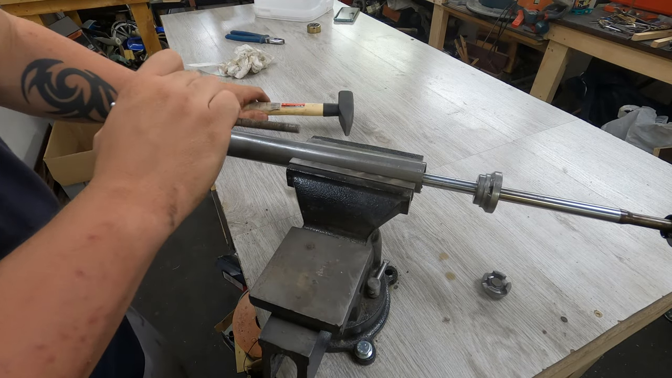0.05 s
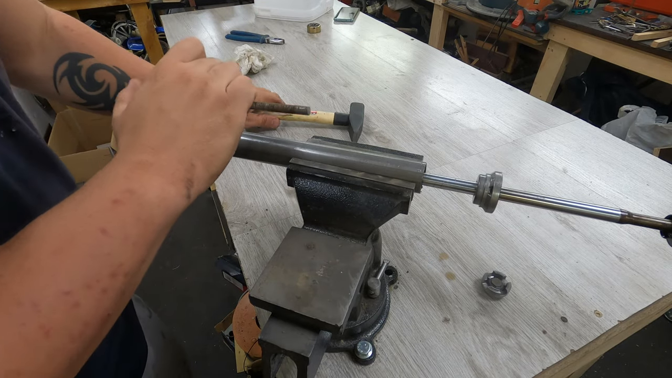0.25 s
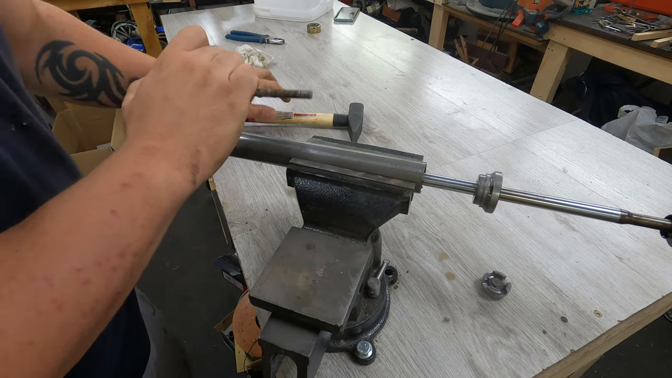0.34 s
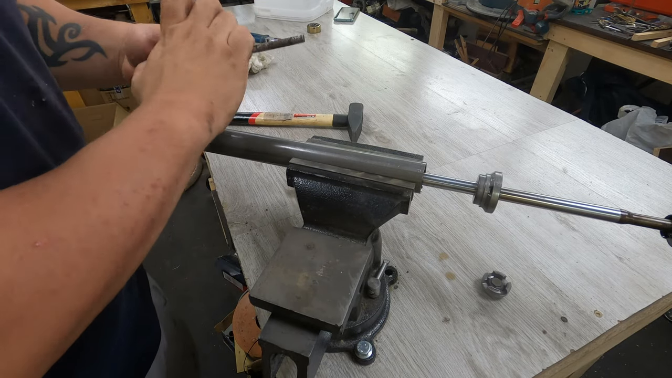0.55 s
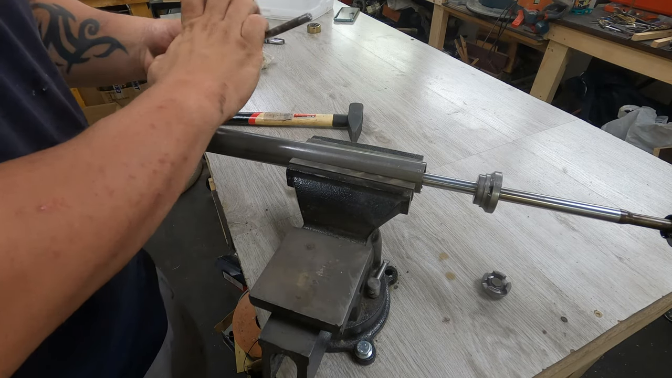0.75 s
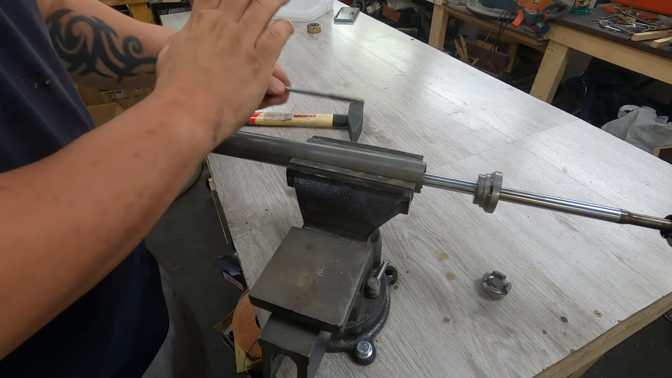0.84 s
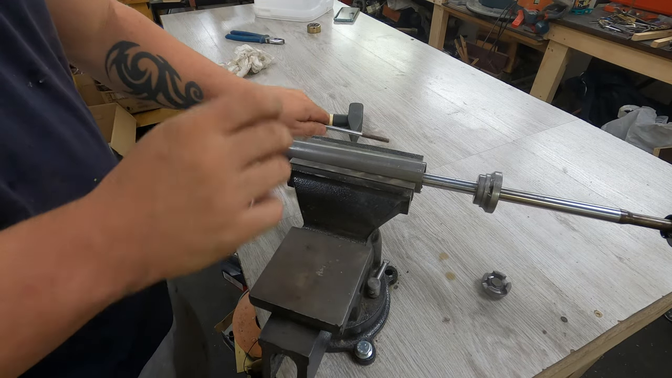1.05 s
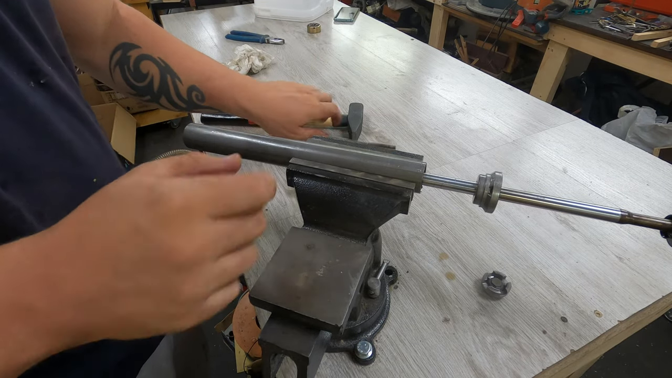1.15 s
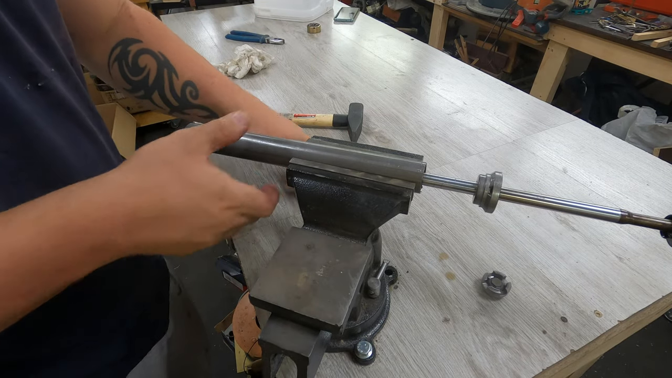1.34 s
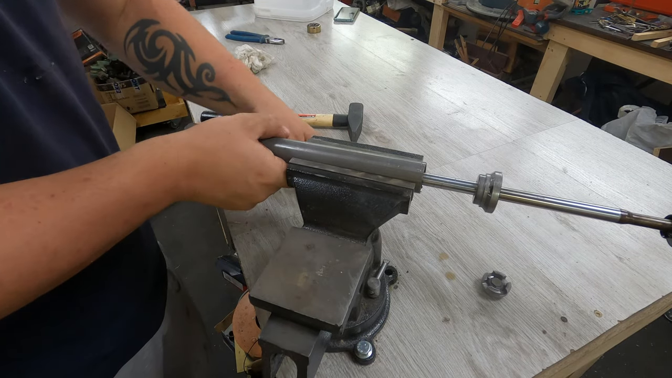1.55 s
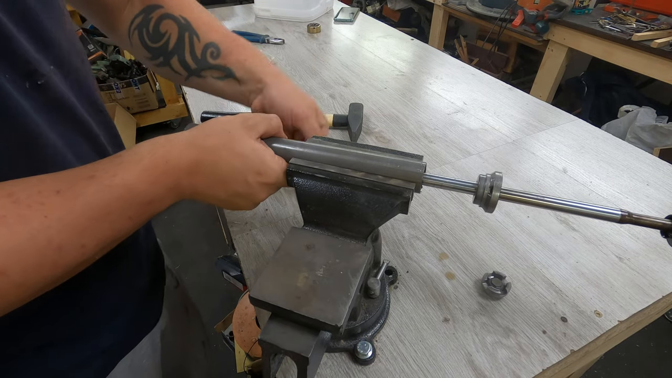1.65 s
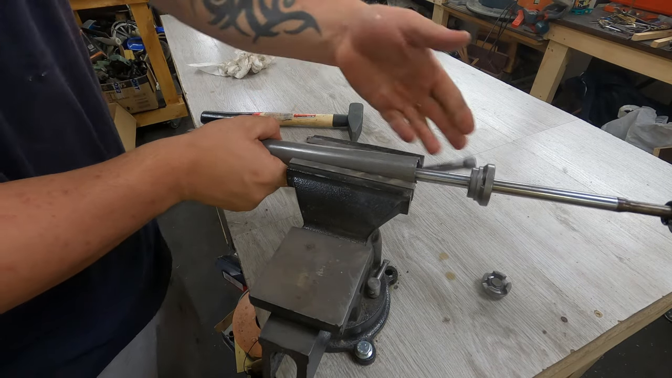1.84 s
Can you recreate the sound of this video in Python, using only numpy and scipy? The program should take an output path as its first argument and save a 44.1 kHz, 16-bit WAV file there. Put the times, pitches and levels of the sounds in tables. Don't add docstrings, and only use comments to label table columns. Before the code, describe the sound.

Steel knocks on a bench vise, close in stereo, in a workshop with low motor hum. After faint touches, heavy double thuds shake the bench at 0.24-0.38 s; bright tube clacks with duller bounces follow at 0.41-0.54. Only hum until 1.18, when a loose rod pings, clatters and chatters to 1.4. Light taps at 1.56, faint sliding hiss from 1.75, last dull tap at 1.85. Short diffuse echoes; background dips after knocks.

```python
import sys
import numpy as np
from scipy import signal
from scipy.fft import rfft, irfft
from scipy.io import wavfile
from scipy.ndimage import uniform_filter1d

SR = 44100
rng = np.random.default_rng(int(sys.argv[2]) if len(sys.argv) > 2 else 0)


def to_wav(s):
    ch = np.atleast_2d(s).T
    pcm = np.round(np.clip(ch, -1, 1) * 32767)
    wavfile.write(sys.argv[1], SR, pcm.astype(np.int16))


def boost(x):
    u = np.asarray(x, float) / 20
    return 10 ** u


N = 81585

# (time [s], crack level [dB], bench level [dB], crack tilt [dB/octave], bench tilt [dB/octave])
THUDS = [
    (.0012, -63.5, -47.5, -11, -3.5),
    (.2335, -46.5, -34, -3.5, 6),
    (.2440, -20, -15, 1.5, 6),
    (.2800, -20.5, -11.5, -1, 2),
    (.2912, -34, -19, 1, -3),
    (.3005, -38, -22, 0, 0),
    (.3226, -35, -36.5, 1.5, 0),
    (.3250, -45.5, -13.5, -6.5, -7.5),
    (.337, -35.5, -28, -10.5, 3.5),
    (.376, -47.5, -23, -5, -4.5),
]
CLACKS = [
    (.1032, -54.5, -77.5, 1.5, 6),
    (.4113, -14.5, -23.5, 2.5, 3),
    (.4276, -26, -28, -6.5, -5),
    (.4722, -20, -29, 2.5, -3),
    (.478, -26.5, -24, -5.5, -3),
    (.5066, -28.5, -41, 1, -0.5),
    (.521, -31.5, -35, -3, -8.5),
    (.5391, -38.5, -32, -3, -2),
]
TUMBLES = [(1.1832, -41, -50.5, -1, 5), (1.1958, -21.5, -28, -4, -4.5), (1.2560, -15, -27.5, 1.3, -0.5),
           (1.2581, -16, -24, -4, -6), (1.2717, -38.5, -23, -7, -2), (1.3140, -24, -45, -2, -4),
           (1.3218, -20, -33, -1.3, -7), (1.3274, -23.5, -40, -4.5, -12), (1.3345, -30, -46, -4, 3),
           (1.3385, -29, -48, -1, 8), (1.3506, -24, -41, -2.5, 15), (1.361, -34.5, -41, -1, -1.5),
           (1.3694, -30.5, -63, -1.5, 13), (1.3892, -35.5, -51, -2, 3), (1.5255, -45.5, -48.5, -5.5, -5),
           (1.6595, -55.5, -60.5, -5.5, 0)]
TAPS = [
    (1.5583, -30, -54, -0.5, -8.5),
    (1.5618, -29, -51.5, -6.5, -6.5),
    (1.8454, -51.5, -57.5, -16, -4.5),
]
# (time [s], level [dB], tilt [dB/octave], damped at [s])
PINGS = [
    (1.184, -31, -8.5, 1.196),
    (1.196, -35, 4, 2),
    (1.259, -42, 3.5, 1.9),
    (1.323, -43, 0, 2.1),
    (1.372, -50, 0.5, 2),
]

# (frequency [Hz], level [dB per Hz])
THUD_COLOUR = [(300, 14), (500, 5), (985, 7.5), (1700, -1), (3700, -10), (6000, -14.5), (9200, -38),
               (13000, -57)]
CLACK_COLOUR = [(300, -4.5), (1000, -11.5), (2000, -11), (4400, -10), (5600, -26.5), (6600, -28),
                (9200, -44), (14000, -60)]
TUMBLE_COLOUR = [(300, -4), (740, -9), (1450, -5.5), (3140, -0.5), (5500, -8), (7500, -18.5), (10000, -37),
                 (15000, -48.5)]
TAP_COLOUR = [(300, -12), (800, -5), (1500, 0), (2500, -7), (4500, -8), (7000, -22), (9200, -72),
              (13000, -47.5)]
# (crack [dB], ring [dB], bench [dB])
THUD_MIX = (2.93, -18.5, -6.5)
CLACK_MIX = (3.1, -1.5, -7)
TUMBLE_MIX = (3.54, -4.5, -5.5)
TAP_MIX = (-2.5, 1.7, 7.9)

# (frequency [Hz], level [dB], T60 [s])
BENCH_MODES = [(107.8, -15.5, 0.22), (120.9, -7.5, 0.12), (166.3, -3, 0.17), (191.5, 1, 0.092),
               (232.8, 1.5, 0.19), (270.8, 0.5, 0.06), (322.7, -3.5, 0.11), (476, 7, 0.032),
               (434, -10.5, 0.027), (525, -9, 0.024), (584, -9.5, 0.037), (772, -7.5, 0.098),
               (943, -11.5, 0.056)]
TUBE_MODES = [(1145, -6.5, .09), (1500, -2.5, 0.027), (1715, -9.5, 0.141), (2440, -17, 0.084),
              (2940, -6, 0.034), (3330, -14.5, .12), (3680, -12.5, 0.16), (3980, -11, 0.085),
              (4224, 5, 0.011), (4346, -10, 0.048), (4560, -13, 0.012), (5510, -3.5, 0.019)]
LOOSE_MODES = [(1235, -7.5, 0.11), (1500, 1.5, 0.039), (1770, -4, 0.026), (2010, -3.5, 0.018),
               (2686, -7, .05), (3030, 4, 0.027), (3190, 0, 0.02), (4000, -40.5, 0.055), (4700, -10, 0.025),
               (5960, -3, 0.028)]
TAPPED_MODES = [(1340, 1.5, 0.099), (1780, 2, 0.032), (2470, 2, 0.022), (3262, -3.5, 0.016),
                (4460, -5, 0.02), (5580, -14, 0.0069)]
ROD_MODES = [(2950, -13, .04), (5437, 0, .06), (9087, -16, .33), (9120, -19, .33), (12980, -32, .22),
             (13400, -30, .03), (14950, -44, .22)]

# (time [s], level [dB])
BENCH_CHATTER = [(.244, -69), (.25, -40.5), (.275, -44.5), (.295, -39), (.33, -49), (.37, -56), (.41, -56)]
TUBE_CHATTER = [(.412, -63), (.422, -41), (.466, -43), (.482, -41.5), (.503, -37), (.53, -45), (.57, -56.5),
                (.62, -83)]
ROD_CHATTER = [(1.196, -66), (1.203, -44.5), (1.25, -52), (1.265, -42), (1.305, -40.5), (1.335, -42),
               (1.38, -41), (1.42, -52), (1.47, -68)]
# (time [s], level [dB])
SLIDE_LEVEL = [(1.739, -80), (1.773, -63), (1.816, -65), (1.85, -66.5)]
# (frequency [Hz], level [dB per Hz])
SLIDE_COLOUR = [(1200, -12), (1800, -1.5), (2500, -27), (3990, -4.5), (5000, -16.5), (8000, -18.5),
                (11000, -28.5), (15000, -51)]

# (frequency [Hz], level [dB per Hz])
FLOOR_COLOUR = [(28, -0.5), (70, -10.5), (140, -21), (340, -29.5), (760, -50), (1100, -37), (4000, -50),
                (9500, -59)]
# (frequency [Hz], correlation [-1..1])
FLOOR_LIKENESS = [(60, 0.98), (210, 0.86), (720, 0.77), (2520, 0.2), (8760, 0.28)]
# (time [s], level [dB])
MOTOR_LEVEL = [(0, -34.5), (.2, -46), (.55, -51.5), (.8, -42.5), (1.099, -43), (1.3, -61), (1.6, -48),
               (1.85, -50)]
DRONE_LEVEL = [(0, -55), (.6, -65.5), (.84, -49), (1.1, -57.5), (1.449, -54), (1.6, -46.5), (1.85, -50)]

# (frequency [Hz], correlation [-1..1])
ROOM_LIKENESS = [(60, 0.97), (210, 1), (720, 0.78), (2520, 0.59), (8760, 0.087)]
# (frequency [Hz], T60 [s])
ROOM_T60 = [(100, 0.99), (400, 0.17), (1500, 0.3), (4000, 0.31), (9000, 0.29)]
# (frequency [Hz], level [dB])
ROOM_COLOUR = [(200, -4.5), (1500, 2.5), (5000, -3), (9000, -7.5), (14000, -11.5)]

EDGES_HZ = 22 * 2 ** np.arange(0, 9.6, .5)
FLOOR_DB, FLOOR_TOP_HZ, FLOOR_PATCH_DB, FLOOR_PATCH_PER_S = -52.5, 8650, 2, 4.8
MOTOR_HZ, DRONE_HZ = 43.5, 96.3
HUM_WAVER_HZ, HUM_WAVER_DB, HUM_WAVER_PER_S = 0.44, -0.5, 2.5
ROOM_DB, ROOM_ONSET_S, RING_TO_ROOM_DB, BENCH_TO_ROOM_DB = -2.5, 0.0026, -14.5, -3
CHATTER_PER_S, CHATTER_SPREAD_DB, CHATTER_RING_DB = 1500, 3, -10
PING_RISE_S, PING_DAMPED_T60_S = 0.0008, 0.038
RING_RISE_CYCLES = 1.6
CRACK_S, CRACK_RISE_S, CRACK_HOLD, CRACK_EDGE = 0.0013, 0.00012, 5.4, 3.52
BENCH_CONTACT_HZ, BENCH_LOWEST_HZ = 920, 90.9
LEFT_DB, LEFT_LAG_SAMPLES = 0.6, 1.2
SHADOW_HZ, SHADOW_TOP_HZ, SHADOW_S, SHADOW_DB = 4000, 10570, 0.0012, -4
DUCK_FROM_DB, DUCK_SHARE, DUCK_BACK_DB_PER_S, DUCK_ATTACK_S = -27, 0.29, 18.5, 0.00042


def at_hz(points, hz):
    points_hz, values = np.transpose(points)
    return np.interp(np.log(hz), np.log(points_hz), values)


def level_curve(points, outside_db=None):
    s, db = np.transpose(points)
    return boost(np.interp(np.arange(N) / SR, s, db, left=outside_db, right=outside_db))


def rms_one(x):
    return x / np.sqrt(np.mean(x ** 2) + 1e-20)


def bands(x):
    for k, (low, high) in enumerate(zip(EDGES_HZ, EDGES_HZ[1:])):
        band = signal.butter(3, [low, high], "band", fs=SR, output="sos")
        yield np.sqrt(low * high), signal.sosfilt(band, x[k % 2])


def coloured(x, colour, above_hz):
    return sum(boost(at_hz(colour, hz)) * b for hz, b in bands(x) if hz > above_hz)


def pair(noise, alike):
    alike = np.clip(alike, -1, 1)
    shared = np.sqrt(1 + alike) * noise[0]
    opposed = np.sqrt(1 - alike) * noise[1] * [[1], [-1]]
    return shared + opposed


def left_right_gain():
    return boost(np.array([[LEFT_DB], [-LEFT_DB]]))


def drift(rate):
    r = np.exp(-2 * np.pi * rate / SR)
    once = signal.lfilter([1 - r], [1, -r], rng.standard_normal(N + SR))
    twice = signal.lfilter([1 - r], [1, -r], once)
    return rms_one(twice[SR:])


def room_noise():
    out = 0
    for hz, b in bands(rng.standard_normal((2, 2, N + SR))):
        level = at_hz(FLOOR_COLOUR, hz) + FLOOR_PATCH_DB * drift(FLOOR_PATCH_PER_S)
        out = out + boost(level) * pair(b[:, SR:], at_hz(FLOOR_LIKENESS, hz))
    lowpass = signal.butter(4, FLOOR_TOP_HZ, fs=SR, output="sos")
    return boost(FLOOR_DB) * rms_one(signal.sosfilt(lowpass, out))


def machine_tone(hz, points):
    turns = rng.random() + np.cumsum(hz + HUM_WAVER_HZ * drift(HUM_WAVER_PER_S)) / SR
    gain = level_curve(points) * boost(HUM_WAVER_DB * drift(HUM_WAVER_PER_S))
    return gain * np.sin(2 * np.pi * turns) * left_right_gain()


def workshop(x):
    t = np.arange(SR) / SR
    tail = 0
    for hz, b in bands(rng.standard_normal((2, 2, SR))):
        t60 = at_hz(ROOM_T60, hz)
        decay = boost(at_hz(ROOM_COLOUR, hz) - 60 * t / t60) / np.sqrt(t60 * SR / 14)
        tail = tail + pair(b, at_hz(ROOM_LIKENESS, hz)) * decay
    tail = tail * (1 - np.exp(-(t / ROOM_ONSET_S) ** 2))
    return boost(ROOM_DB) * signal.fftconvolve(x[None], tail, axes=1)[:, :N]


def slide():
    hiss = rms_one(coloured(rng.standard_normal((2, 2, N)), SLIDE_COLOUR, 1000))
    s, db = np.transpose(SLIDE_LEVEL)
    return boost(np.interp(np.arange(N) / SR, s, db, left=-140)) * hiss


def ring(clicks, hz, t60):
    r = boost(-60 / (max(t60, .001) * SR))
    w = 2 * np.pi * hz / SR
    return signal.lfilter([0, np.sin(w)], [1, -2 * r * np.cos(w), r * r], clicks + 1e-18)


def swell(clicks, hz, t60):
    share = np.exp(-hz / RING_RISE_CYCLES / SR)
    rise_t60 = np.log(1000) * RING_RISE_CYCLES / hz
    return 2 * (1 - share) * ring(ring(clicks, hz, t60), hz, rise_t60)


def chatter(points, colour, modes):
    spread_db = CHATTER_SPREAD_DB * np.minimum(rng.exponential(1, (2, N)), 4)
    sizes = boost(spread_db) * rng.choice([-1, 1], (2, N))
    grains = sizes * (rng.random((2, N)) < CHATTER_PER_S / SR)
    gain = level_curve(points, -140)
    bare = rms_one(coloured(grains + 1e-18, colour, 500))
    grains = grains * gain
    rung = 0
    for k, (hz, level_db, t60) in enumerate(modes):
        rung = rung + boost(level_db) * ring(grains[k % 2], hz, t60) / np.sqrt(t60 * SR)
    return bare * gain + boost(CHATTER_RING_DB + 7) * rung


def pings():
    out = np.zeros(N + SR)
    t = np.arange(SR) / SR
    rise = 1 - np.exp(-t / PING_RISE_S)
    for s, db, tilt_db, until in PINGS:
        start = int(s * SR)
        damped_db = -60 * np.maximum(t + s - until, 0) / PING_DAMPED_T60_S
        for hz, level_db, t60 in ROD_MODES:
            mode_db = db + level_db + tilt_db * np.log2(hz / 5000)
            gain = boost(mode_db - 60 * t / t60 + damped_db)
            out[start:start + SR] += gain * rise * np.sin(2 * np.pi * hz * t)
    return out[:N]


def strike(s, db, modes, sound=ring, tilt_db=0):
    out = 0
    chance_db = rng.normal(0, 2.8, (len(s), len(modes)))
    for k, (hz, level_db, t60) in enumerate(modes):
        clicks = np.zeros(N + SR)
        tilted_db = level_db + tilt_db * np.log2(hz / 250)
        clicks[(s * SR).astype(int)] = boost(db + tilted_db - 6.5 + chance_db[:, k])
        out = out + sound(clicks[:N], hz, t60)
    return out


def crack_bursts(colour, tilt_db):
    t = np.arange(600) / SR
    burst = rng.standard_normal((len(tilt_db), 2, len(t))) * np.exp(-t / CRACK_S)
    burst[:, :, 6] += CRACK_EDGE
    spectrum = rfft(burst)
    even = irfft(spectrum / np.abs(spectrum), len(t))
    burst = even * np.exp(-t / CRACK_S / CRACK_HOLD) * (1 - np.exp(-t / CRACK_RISE_S))
    out = 0
    for hz, b in bands(burst.swapaxes(0, 1)):
        if hz > 250:
            out = out + boost(at_hz(colour, hz) + tilt_db[:, None] * np.log2(hz / 1000)) * b
    out = out * np.cos(np.pi / 2 * t / t[-1])
    return out / np.abs(out).max(axis=1, keepdims=True)


def knocks(blows, colour, modes, mix):
    s, crack_db, bench_db, tilt_db, bench_tilt_db = np.transpose(blows)
    crack_mix_db, ring_mix_db, bench_mix_db = mix
    crack = np.zeros(N + SR)
    for at, db, burst in zip(s, crack_db, crack_bursts(colour, tilt_db)):
        start = int(at * SR)
        crack[start:start + len(burst)] += boost(db + crack_mix_db) * burst
    rings = strike(s, crack_db + ring_mix_db, modes, swell)
    bench = strike(s, bench_db + bench_mix_db, BENCH_MODES, tilt_db=bench_tilt_db)
    soft = np.exp(-2 * np.pi * BENCH_CONTACT_HZ / SR)
    bench = signal.lfilter([1 - soft], [1, -soft], bench)
    return np.array([crack[:N], rings, bench])


def at_microphones(hits):
    turn = np.exp(-2j * np.pi * np.fft.rfftfreq(N) * LEFT_LAG_SAMPLES)
    late = irfft(rfft(hits) * turn, N)
    band = signal.butter(2, [SHADOW_HZ, SHADOW_TOP_HZ], "band", fs=SR, output="sos")
    treble = np.roll(signal.sosfilt(band, hits), int(SHADOW_S * SR))
    return np.array([late, hits]) + boost(SHADOW_DB) * treble * [[1], [-1]]


def scene():
    hum = room_noise() + machine_tone(MOTOR_HZ, MOTOR_LEVEL) + machine_tone(DRONE_HZ, DRONE_LEVEL)
    blows = knocks(THUDS, THUD_COLOUR, TUBE_MODES, THUD_MIX)
    blows = blows + knocks(CLACKS, CLACK_COLOUR, TUBE_MODES, CLACK_MIX)
    blows = blows + knocks(TUMBLES, TUMBLE_COLOUR, LOOSE_MODES, TUMBLE_MIX)
    blows = blows + knocks(TAPS, TAP_COLOUR, TAPPED_MODES, TAP_MIX)
    crack, rings, bench = blows
    rings = rings + pings()
    crack = crack + chatter(BENCH_CHATTER, THUD_COLOUR, TUBE_MODES)
    crack = crack + chatter(TUBE_CHATTER, CLACK_COLOUR, TUBE_MODES)
    crack = crack + chatter(ROD_CHATTER, TUMBLE_COLOUR, LOOSE_MODES)
    highpass = signal.butter(4, BENCH_LOWEST_HZ, "high", fs=SR, output="sos")
    bench = signal.sosfilt(highpass, bench)
    echo = workshop(crack + boost(RING_TO_ROOM_DB) * rings + boost(BENCH_TO_ROOM_DB) * bench)
    near = at_microphones(crack + rings + bench)
    return (near + echo) * left_right_gain() + slide() + hum


def top_cut(x):
    return signal.sosfilt(signal.butter(12, 16350, fs=SR, output="sos"), x)


def record(dry):
    power = uniform_filter1d(np.mean(dry ** 2, axis=0), size=128)
    level_db = 10 * np.log10(power + 1e-12)
    over_db = np.maximum(level_db - DUCK_FROM_DB, 0) * DUCK_SHARE
    recovery_db = DUCK_BACK_DB_PER_S * np.arange(N) / SR
    held_db = np.maximum(np.maximum.accumulate(over_db + recovery_db) - recovery_db, 0)
    r = np.exp(-1 / (DUCK_ATTACK_S * SR))
    duck_db = signal.lfilter([1 - r], [1, -r], held_db)
    return top_cut(dry * boost(-duck_db))


dry = scene()
out = record(dry)
to_wav(out)
```